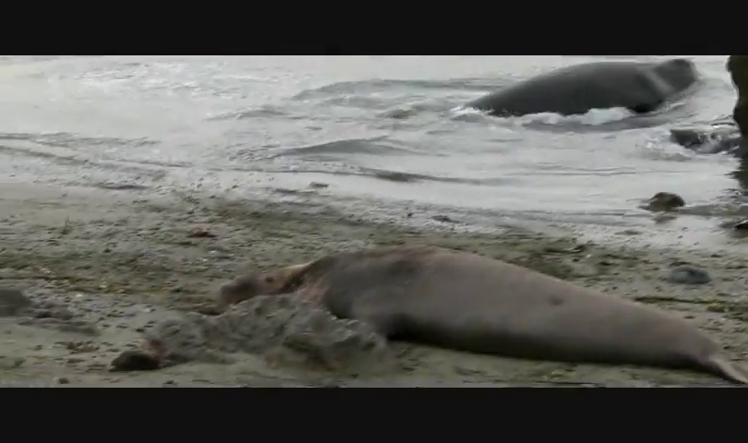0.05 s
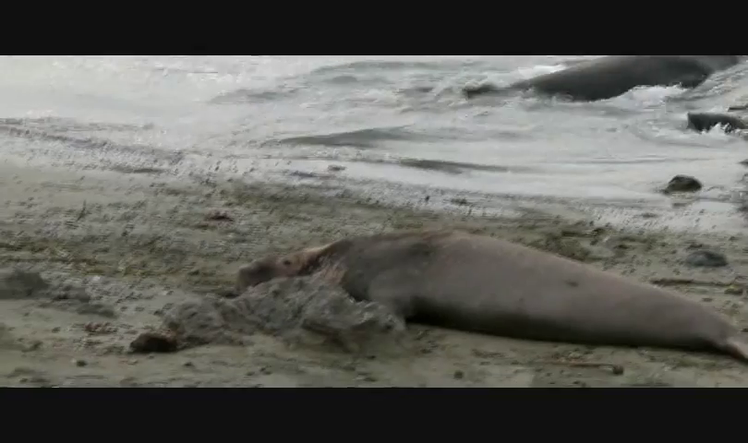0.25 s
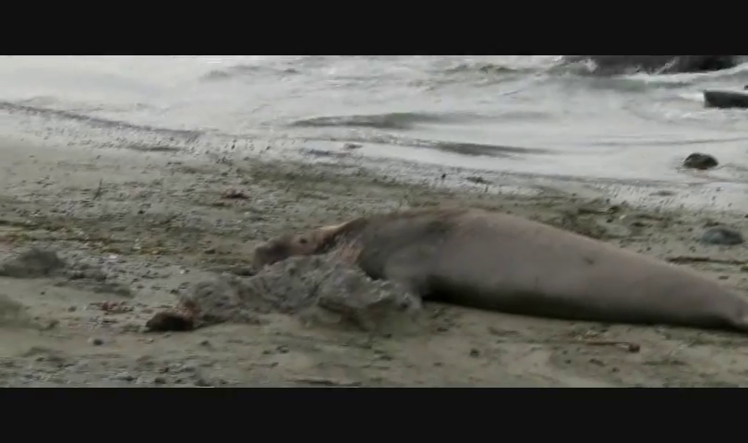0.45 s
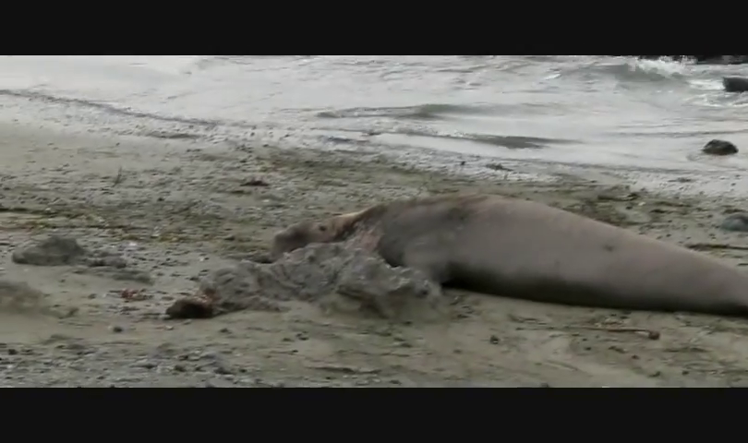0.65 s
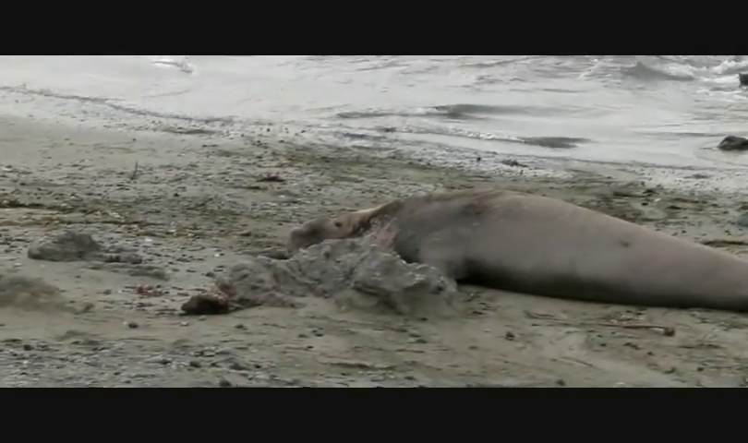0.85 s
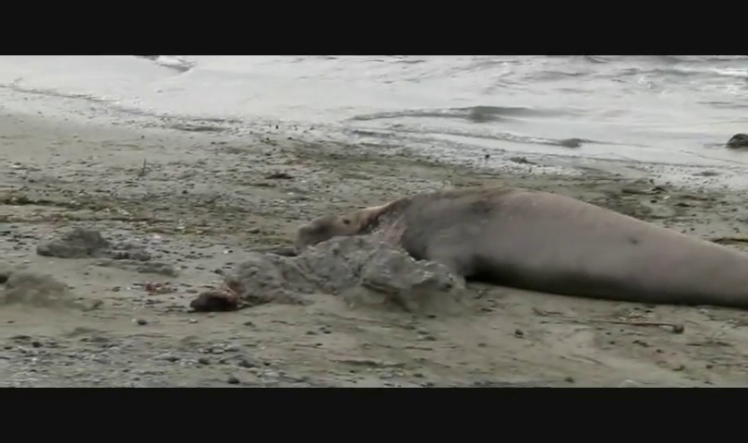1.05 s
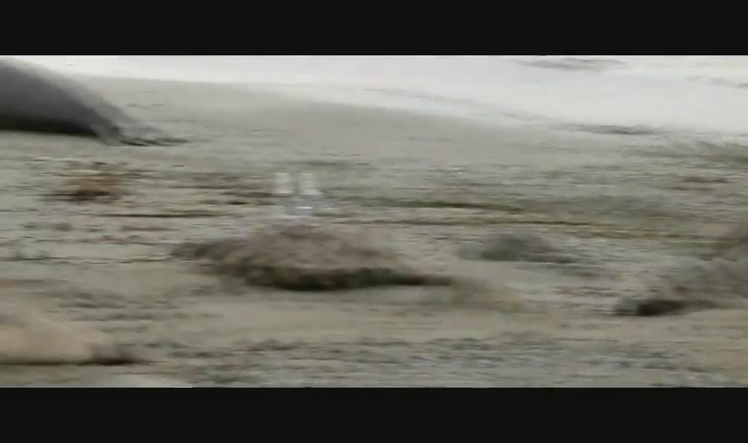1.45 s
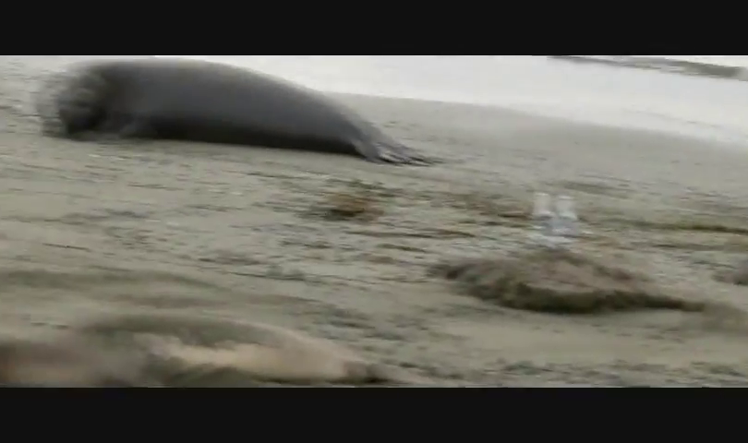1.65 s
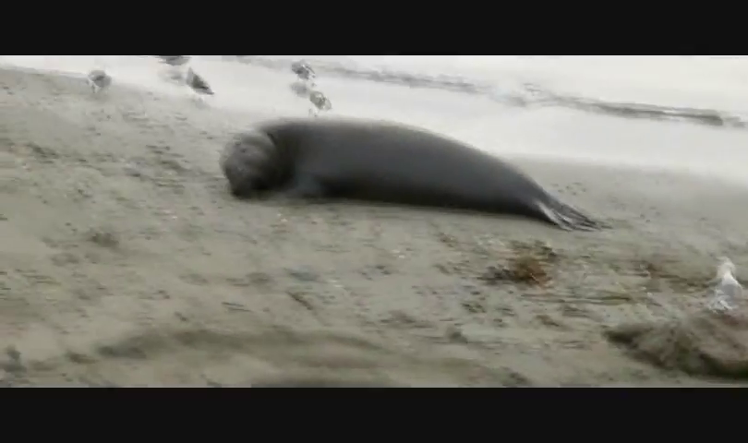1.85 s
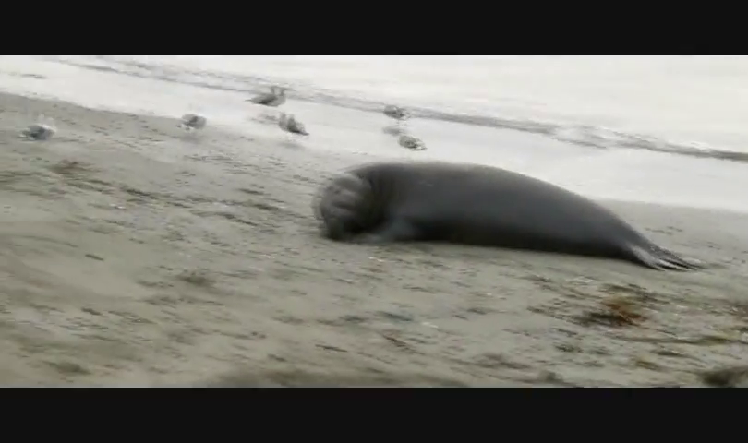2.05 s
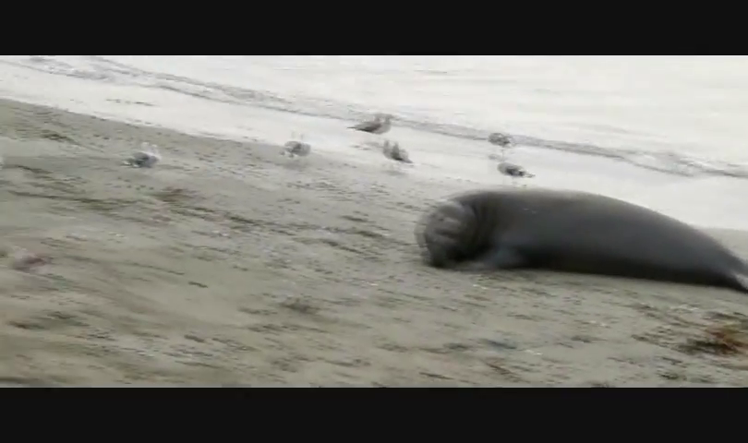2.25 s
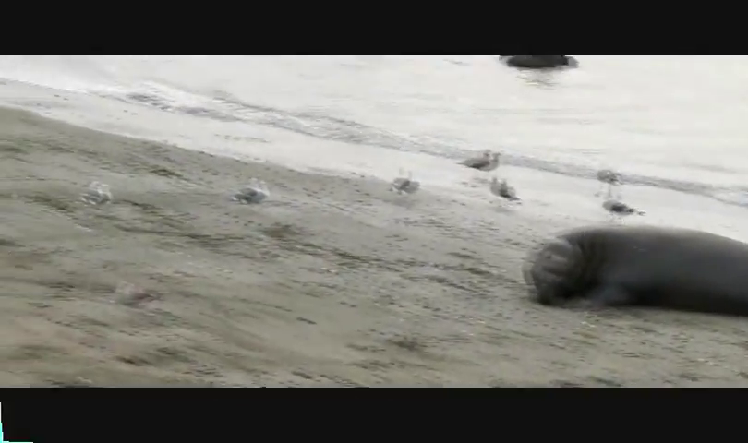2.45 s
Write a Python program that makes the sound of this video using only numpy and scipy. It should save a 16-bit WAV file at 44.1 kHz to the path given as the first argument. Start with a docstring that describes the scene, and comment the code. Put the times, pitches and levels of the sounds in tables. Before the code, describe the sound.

Two loud, raspy, rattling bellows come from an elephant seal, slightly to the right, followed by a more distant seal's hollow knocking. Behind them, waves wash steadily onto the open beach with faint crackling foam and a little wind rumble.

```python
"""Elephant seals on a beach

An elephant seal bellows twice: its throat flaps about 80 times a second, and the rattle rings the
resonances (favoured pitches) of its open mouth. Gurgles and a few low thumps lie under the calls.
Further off another seal answers with hollow throat knocks, and small dry ticks sound close by.
Surf washes steadily behind, with crackling foam and a little wind rumble."""
import sys
import numpy as np
from scipy import signal
from scipy.io import wavfile
from scipy.ndimage import uniform_filter1d

SR = 44100
rng = np.random.default_rng(int(sys.argv[2]) if len(sys.argv) > 2 else 0)


def dump(signal):
    """Clip the signal to [-1, 1] and save it as 16-bit WAV at the path in sys.argv[1]."""
    limited = np.clip(np.atleast_2d(signal).T, -1, 1)
    pcm = np.round(limited * 32767).astype(np.int16)
    wavfile.write(sys.argv[1], SR, pcm)


N = 114660
T = np.arange(N) / SR
LOW_LEAD_S, MIDDLE_LEAD_S, HIGH_LEAD_S = 0.002984, 0.0014, 0.00019   # each flap rings the lows first

# How the voice's three bands rise and fall, one list per bellow: time_s, low_db, middle_db, high_db
BELLOW_LEVELS = [
    [(.19, -38, -37, -78), (.213, -13.5, -29.5, -46), (.25, -15, -36, -36.5), (.335, -16, -38, -28.5),
     (.385, -14, -37, -32), (.435, -19.5, -33.5, -32), (.47, -25, -32, -37), (.515, -24.5, -30.5, -32.5),
     (.545, -17, -24, -27), (.635, -16, -25, -29), (.675, -38, -35.5, -41.5)],
    [(.76, -27.5, -34, -38), (.806, -14, -22, -25.5), (.925, -22, -28, -41.5), (1.0, -18.5, -25, -34),
     (1.06, -23.5, -27, -35.5), (1.14, -26.5, -27.5, -35), (1.22, -26, -22.5, -32), (1.33, -30, -33, -41.5),
     (1.405, -27, -26.5, -26), (1.455, -27.5, -28.5, -31), (1.5, -38.5, -39, -41)],
]
def bellow(times, notch_hz=1187, notch_width_hz=144):
    """One train of throat flaps rings the chest, the throat and the mouth."""
    sizes = from_db(rng.normal(0, 0.5, len(times)))   # no two flaps are quite as strong
    flaps = times, sizes
    low, middle, high = sum(from_db(over_time(rows, -200)) for rows in BELLOW_LEVELS)
    voice = low * (mouth_low(flaps) + throat(flaps)) + chest(flaps) + middle * mouth_middle(flaps)
    shared, left, right = (flap_pulses(flaps, HIGH_LEAD_S, leak=0.54) for _ in range(3))
    each_ear = np.array([left, right])
    voice += high * mouth_high(shared + 0.43 * each_ear)
    # a side cavity swallows one narrow band
    voice = signal.lfilter(*signal.iirnotch(notch_hz, notch_hz / notch_width_hz, SR), voice)
    return voice + np.sqrt(middle * high) * sizzle(each_ear)


# How fast the throat flaps, one list per bellow: time_s, flaps_per_s
FLAP_RATES = [
    [(.199, 85.6), (.235, 91.6), (.265, 64.8), (.33, 73.7), (.38, 88.7), (.43, 75.5), (.51, 67.8),
     (.56, 77), (.62, 83.3), (.67, 67.6)],
    [(.765, 67.3), (.82, 83.1), (.93, 74.8), (1.02, 81.6), (1.08, 78.8), (1.16, 83.3), (1.28, 80.1),
     (1.34, 69.5), (1.41, 81.5), (1.5, 80.3)],
]
def flap_times(jitter_s=0.00015):
    """The throat opens once a cycle, slightly unevenly."""
    times = []
    for rows in FLAP_RATES:
        cycles = np.cumsum(over_time(rows, 0)[0]) / SR
        calling = (T >= rows[0][0]) & (T <= rows[-1][0])
        times += list(np.interp(np.arange(round(cycles[-1]) + 1), cycles[calling], T[calling]))
    return np.array(times) + rng.normal(0, jitter_s, len(times))


# How breathy the voice is, from clean flaps (0) to rushing air (1): time_s, roughness
ROUGHNESS = [(.2, 0.77), (.31, 0.93), (.38, 0.62), (.6, 0.66), (.8, 0.91), (1.0, 0.34), (1.4, 0.59)]
def flap_pulses(flaps, lead_s, leak=1, extra_air=0.79, air_scale=1):
    """Each flap is a slap plus a puff of air; the rougher the voice, the more air leaks in between."""
    times, sizes = flaps
    roughness, = over_time(ROUGHNESS)
    slaps = np.zeros(N)
    slaps[((times - lead_s) * SR).astype(int)] = sizes
    puff_shape = signal.windows.gaussian(801, 0.0018 * SR)
    puffs = signal.fftconvolve(slaps, puff_shape, "same")
    leaking = leak * roughness ** 3 * (T > times[0]) * (T < times[-1])
    air = (puffs + leaking) * rng.standard_normal(N)
    air_share = air_scale * (roughness + (1 - roughness) * extra_air)
    return np.sqrt(1 - air_share) * rms_one(slaps) + np.sqrt(air_share) * rms_one(air)


# The mouth's lowest resonance, which narrows as the call settles: time_s, pitch_hz, width_hz
LOW_RESONANCE = [(.2, 1016, 324), (.37, 925, 191), (.46, 964, 152), (.95, 991, 121), (1.3, 976, 135),
                 (1.45, 974, 314)]
def mouth_low(flaps):
    """The body of the bellow: the mouth rings, and the hollow of the snout rings on at one pitch."""
    pulses = flap_pulses(flaps, LOW_LEAD_S, extra_air=0, air_scale=0.97)
    snout = from_db(-5) * resonate(pulses, hz=988.6, width_hz=39)
    return pan(-2.5) * from_db(1.1) * steady(moving_resonance(pulses + snout, *over_time(LOW_RESONANCE)))


# The throat's resonance, narrower and stronger late in the calls: time_s, relative_db, width_hz
THROAT_RESONANCE = [(.3, -8, 264), (.6, -11, 193), (.92, -13, 100), (1.25, -4.5, 120)]
def throat(flaps, pitch_hz=749):
    """The flaps ring the throat at one pitch, below those of the mouth."""
    pulses = flap_pulses(flaps, LOW_LEAD_S, extra_air=0, air_scale=0.97)
    db, width_hz = over_time(THROAT_RESONANCE)
    return from_db(db) * steady(moving_resonance(pulses, pitch_hz, width_hz))


# How loud the chest growls: time_s, level_db
CHEST_LEVEL = [(.2, -32), (.4, -48), (.68, -58), (.76, -32), (.83, -25.5), (.99, -32), (1.14, -45),
               (1.3, -36), (1.5, -37)]
def chest(flaps):
    """The flaps make the chest growl, mostly at the start of the second bellow."""
    growl = resonate(flap_pulses(flaps, LOW_LEAD_S), hz=390, width_hz=320)
    return from_db(over_time(CHEST_LEVEL)[0]) * steady(growl)


# The mouth's middle resonances: pitch_hz, width_hz, relative_db
MIDDLE_RESONANCES = [(1510, 450, 1.5), (1855, 490, 1.5)]
def mouth_middle(flaps):
    """Breathy flaps ring two broad resonances of the mouth."""
    pulses = flap_pulses(flaps, MIDDLE_LEAD_S, leak=0.54)
    return pan(-6) * from_db(1.15) * ring_together(pulses, MIDDLE_RESONANCES)


# The mouth's high resonances: pitch_hz, width_hz, relative_db
HIGH_RESONANCES = [(2170, 530, 1.1), (2597, 263, 9.4)]
# The top resonance, which arches as the mouth opens and closes: time_s, pitch_hz
TOP_RESONANCE = [(.27, 2840), (.6, 2946), (1.34, 2895), (1.4, 2950), (1.47, 2530)]
def mouth_high(pulses):
    """The bright edge of the voice: two still resonances and a gliding one."""
    top_hz, = over_time(TOP_RESONANCE)
    top = steady(np.array([moving_resonance(ear, top_hz, width_hz=280) for ear in pulses]))
    return pan(-9) * from_db(2) * steady(ring_together(pulses, HIGH_RESONANCES) + from_db(-5) * top)


# The hissing resonances above the voice: pitch_hz, width_hz, relative_db
SIZZLE_RESONANCES = [(4540, 650, 7), (6100, 2500, -1.5), (8060, 840, 2.5), (10900, 4000, -10)]
def sizzle(pulses):
    """Air sizzles faintly in the mouth, differently in each ear."""
    return pan(-5) * from_db(-14.5) * ring_together(pulses, SIZZLE_RESONANCES)


# The sinking rasp that opens the first bellow: time_s, roar_db, pitch_hz, hiss_db
RASP = [(.19, -36, 1920, -45), (.215, -19.5, 1720, -36.5), (.27, -32.5, 1410, -39.5), (.34, -36, 1360, -50)]
def rasp(times):
    """Air tears through the throat, one gust a flap, with a bright burst as the mouth opens."""
    roar_db, hz, hiss_db = over_time(RASP)
    gusts = flap_pulses((times, np.ones(len(times))), MIDDLE_LEAD_S, extra_air=1)
    roar = from_db(roar_db) * steady(moving_resonance(gusts, hz, width_hz=380))
    hiss = from_db(hiss_db) * steady(resonate(gusts, hz=4460, width_hz=810))
    bright_air = rms_one(resonate(rng.standard_normal((2, N)), hz=7600, width_hz=5100))
    burst = from_db(-40) * swell(start_s=0.197, rise_s=0.015) * bright_air
    rasping = (T > RASP[0][0]) * (T < RASP[-1][0])
    return pan(-6) * (burst + rasping * (roar + hiss))


# Gurgles in the throat: start_s, level_db, pitch_hz
GURGLES = [(0.266, -17, 403), (.298, -12, 389), (.330, -15.5, 389), (.972, -23, 370), (1.235, -25.5, 586),
           (1.312, -25, 345), (1.355, -20.5, 340)]
def gurgles():
    """Slow pops deep in the bellowing throat."""
    return sum(throat_pop(start_s, db, hz, width_hz=59, grit=0.35) for start_s, db, hz in GURGLES)


def throat_pop(start_s, db, hz, width_hz, grit):
    """A single low pop of a throat, ringing briefly with a rough edge."""
    tone = np.sin(2 * np.pi * hz * (T - start_s))
    rough_edge = grit * rms_one(resonate(rng.standard_normal(N), hz, hz))
    return from_db(db) * swell(start_s, 1 / (np.pi * width_hz)) * (tone + rough_edge)


# Low thumps: start_s, level_db
THUMPS = [(0.754, -32.5), (.91, -33), (1.228, -31)]
def thumps():
    """Soft bumps of low noise under the second bellow."""
    rumble = steady(resonate(rng.standard_normal(N), hz=126, width_hz=110))
    return rumble * sum(from_db(db) * swell(start_s, rise_s=0.014) for start_s, db in THUMPS)


# The far seal's throat knocks: start_s, level_db, snap_boost_db
KNOCKS = [(1.49, -23.5, -7), (1.516, -20.5, -13), (1.592, -19.5, -24), (1.643, -22.5, -52),
          (1.666, -26, -30), (2.055, -23, -1.5), (2.157, -18.5, -8), (2.208, -19.5, -10),
          (2.236, -18, -6.5), (2.262, -19.5, -21), (2.288, -19, -12), (2.317, -19.5, -22),
          (2.345, -22, -29), (2.418, -25, -0.5), (2.449, -27, 0), (2.48, -24.5, -1), (2.518, -27.5, 5)]
# A faint low drone under the last knocks: time_s, level_db
DRONE_LEVEL = [(2.2, -78), (2.29, -35), (2.4, -37), (2.45, -60)]
def far_seal(drone_hz=139):
    """Hollow throat knocks, each with a snap on top, and a wavering drone."""
    snap = 0.5 * rms_one(resonate(rng.standard_normal(N), hz=1930, width_hz=1000))
    wavering_hz = drone_hz * (1 + 0.018 * drift(turns_per_s=24.4))
    drone = np.sin(2 * np.pi * np.cumsum(wavering_hz) / SR)
    out = from_db(over_time(DRONE_LEVEL, -200)[0]) * drone
    for start_s, db, snap_boost_db in KNOCKS:
        out += throat_pop(start_s, db, hz=477, width_hz=95, grit=0.13)
        out += from_db(db + snap_boost_db) * swell(start_s, rise_s=0.0018) * snap
    return out


# Small dry ticks: start_s, level_db, pitch_hz
TICKS = [(1.449, -29.5, 4950), (1.476, -27.5, 4930), (1.5507, -27.5, 5450), (1.677, -40, 11000),
         (2.004, -36.5, 9500), (2.062, -31.5, 5500), (2.141, -33.5, 5000)]
def ticks():
    """Tiny bursts of noise close by, some bright and some with more body."""
    noise = rng.standard_normal((2, N))
    return sum(from_db(db) * swell(start_s, rise_s=0.0011) * rms_one(resonate(noise, hz, 1.24 * hz))
               for start_s, db, hz in TICKS)


# The echo from the sand and rocks: delay_s, level_db
ECHO = [(.021, -16)]
def echo(sound, dull_above_hz=2500):
    """One dull reflection in the open air."""
    dull = signal.sosfilt(signal.butter(1, dull_above_hz, fs=SR, output="sos"), sound.mean(0))
    return sum(from_db(db) * np.interp(T - delay_s, T, dull, 0) for delay_s, db in ECHO)


# The surf's tone, from wind rumble up to hiss: pitch_hz, relative_db
SURF_TONE = [(25, -22), (45, -9), (140, -1.5), (210, -3), (470, 3), (800, -2.5), (2700, -10.5), (3800, -16),
             (6000, -19), (12000, -29.5), (15500, -33)]
# How loud the surf is: time_s, level_db
SURF_LEVEL = [(0, -32), (.7, -35.5), (1.1, -32), (1.9, -33), (2.3, -32.5), (2.6, -35.5)]
# How its hiss rises and falls: time_s, boost_db
SURF_HISS = [(.4, 0), (1.5, 0.5), (2.1, 1), (2.35, -1.5)]
# How alike it sounds in the two ears (1 is the same): pitch_hz, likeness
SURF_LIKENESS = [(30, 0.2), (110, 1), (600, 1), (3000, 0.63), (12000, 0.58)]
# How much its level flickers: pitch_hz, spread_db
SURF_FLICKER = [(600, 2), (3000, 1.55)]
def surf(hiss_above_hz=2800):
    """Wash and wind: half-octave bands of noise, each flickering on its own."""
    out, edges_hz = 0, 22 * 2 ** np.arange(0, 9.6, .5)
    noise = rng.standard_normal((2, 2, N))
    hiss_db, = over_time(SURF_HISS)
    for k, (low_hz, high_hz) in enumerate(zip(edges_hz, edges_hz[1:])):
        band = signal.butter(2, [low_hz, high_hz], "band", fs=SR, output="sos")
        shared, side = signal.sosfilt(band, noise[k % 2])
        hz = np.sqrt(low_hz * high_hz)
        alike = at_pitch(SURF_LIKENESS, hz)
        wash = np.sqrt(1 + alike) * shared + np.sqrt(1 - alike) * side * [[1], [-1]]
        flicker_db = at_pitch(SURF_FLICKER, hz) * drift(turns_per_s=25)
        out += wash * from_db(at_pitch(SURF_TONE, hz) + flicker_db + hiss_db * (hz > hiss_above_hz))
    return pan(-0.7) * from_db(over_time(SURF_LEVEL)[0]) * rms_one(out)


def foam(bubbles_per_s=100):
    """Tiny bubbles crackle in the wash, different in each ear."""
    pops = rng.random((2, N)) < bubbles_per_s / SR
    sizes = from_db(3.5 * np.minimum(rng.exponential(1, (2, N)), 4))
    return from_db(-55) * rms_one(resonate(pops * sizes, hz=6500, width_hz=6500))


def resonance_filter(hz, width_hz):
    """A resonance applied twice, so it starts softly and lets little through away from its pitch."""
    decay = np.exp(-np.pi * width_hz / SR) ** 2
    gain = (1 - decay) / 2
    return [[gain, 0, -gain, 1, -(1 + decay) * np.cos(2 * np.pi * hz / SR), decay]] * 2


def resonate(sound, hz, width_hz):
    """Make a sound ring at one pitch; the narrower the width, the longer it rings."""
    return signal.sosfilt(resonance_filter(hz, width_hz), sound + 1e-18)


def moving_resonance(sound, hz, width_hz, block=64):
    """Make a sound ring while the pitch or the width moves in small steps."""
    hz, width_hz = np.broadcast_arrays(hz, width_hz)
    out, state = np.zeros(N), np.zeros((2, 2))
    for i in range(0, N, block):
        resonance = resonance_filter(hz[i], width_hz[i])
        out[i:i + block], state = signal.sosfilt(resonance, sound[i:i + block] + 1e-18, zi=state)
    return out


def ring_together(sound, resonances):
    """Ring several resonances side by side, every other one flipped, at a steady level."""
    return steady(sum((-1) ** k * from_db(db) * resonate(sound, hz, width_hz)
                      for k, (hz, width_hz, db) in enumerate(resonances)))


def steady(sound, window=1100):
    """Hold the level near 1, averaged over a couple of flaps."""
    power = np.atleast_2d(sound ** 2).mean(0)
    power = uniform_filter1d(uniform_filter1d(power, window), window // 2)
    return sound / np.sqrt(np.maximum(power, 0) + 1e-4 * power.max())


def swell(start_s, rise_s):
    """A level that climbs to 1 within rise_s, then dies away."""
    age = np.clip((T - start_s) / rise_s, 0, 60)
    return age * np.exp(1 - age)


def drift(turns_per_s):
    """A random wander of typical size 1."""
    return rms_one(np.interp(T * turns_per_s, np.arange(400), rng.standard_normal(400)))


def over_time(rows, outside=None):
    """Turn each column after time_s into a curve over the scene."""
    time_s, *columns = np.transpose(rows)
    return [np.interp(T, time_s, column, outside, outside) for column in columns]


def at_pitch(rows, hz):
    """Look up a table's value at one pitch."""
    pitches_hz, values = np.transpose(rows)
    return np.interp(np.log(hz), np.log(pitches_hz), values)


def pan(left_minus_right_db):
    """Gains for the two ears; below zero leans right."""
    gains = from_db([[left_minus_right_db / 2], [-left_minus_right_db / 2]])
    return gains / gains.mean()


def from_db(db):
    """Turn decibels into a gain."""
    return 10 ** (np.asarray(db) / 20)


def rms_one(sound):
    """Scale to an average (rms) level of 1."""
    return sound / np.sqrt(np.mean(sound ** 2) + 1e-20)


def scene():
    """The seals and their echo over the surf; the left ear hears it all one sample later."""
    times = flap_times()
    seals = bellow(times) + rasp(times) + gurgles() + far_seal()
    left, right = seals + echo(seals) + thumps() + ticks() + surf() + foam()
    return np.array([np.concatenate([[0], left[:-1]]), right])


def record(dry):
    """Cut the highest treble, above 15400 Hz."""
    return signal.sosfilt(signal.ellip(10, .1, 80, 15400, fs=SR, output="sos"), dry)


dry = scene()
out = record(dry)
dump(out)
```